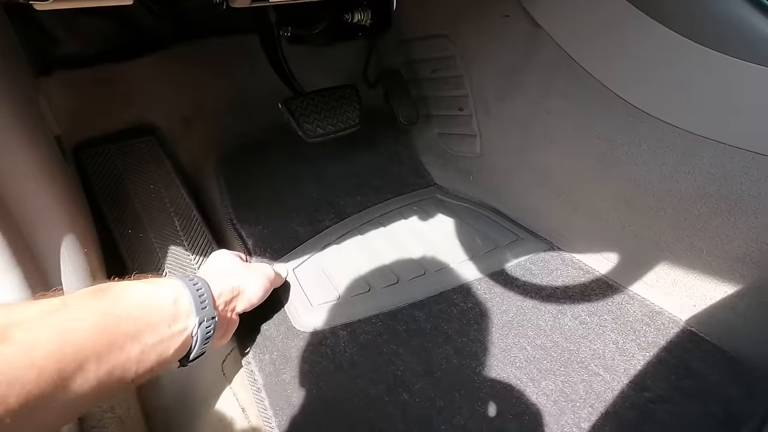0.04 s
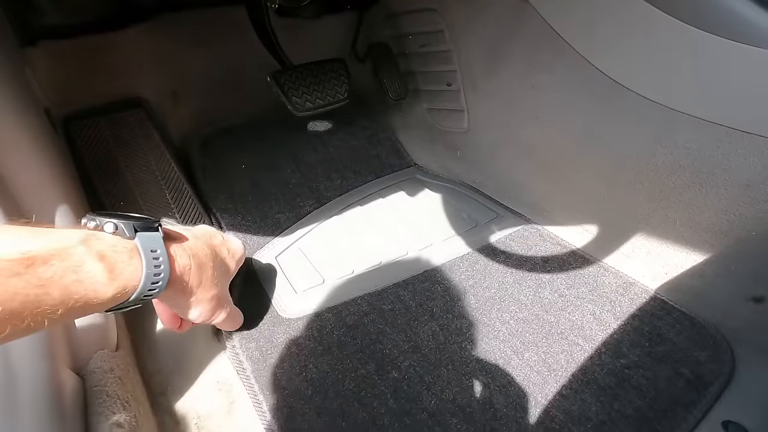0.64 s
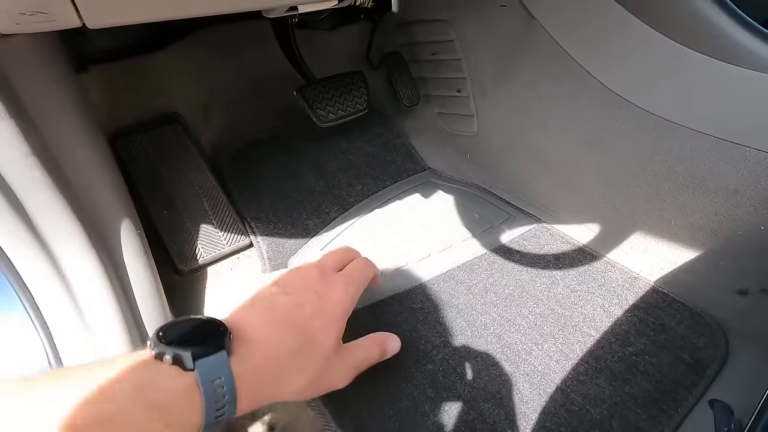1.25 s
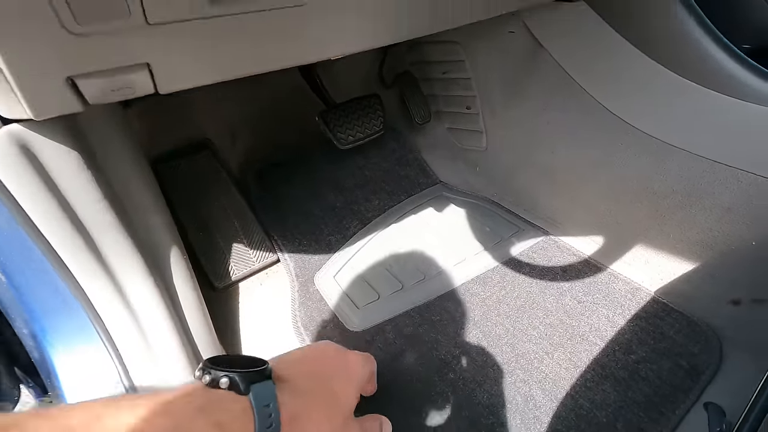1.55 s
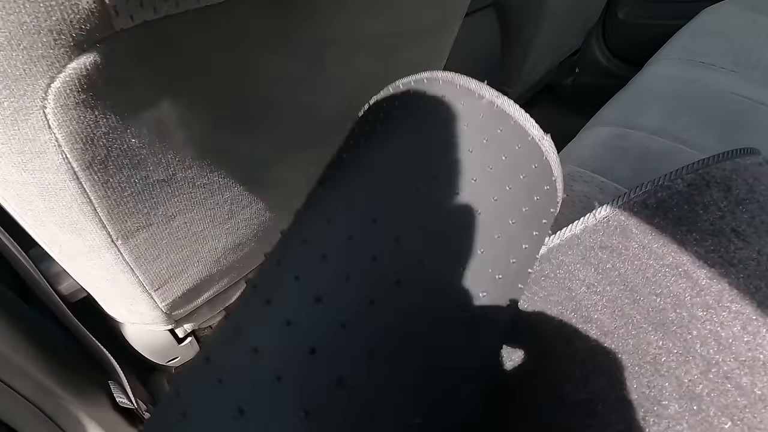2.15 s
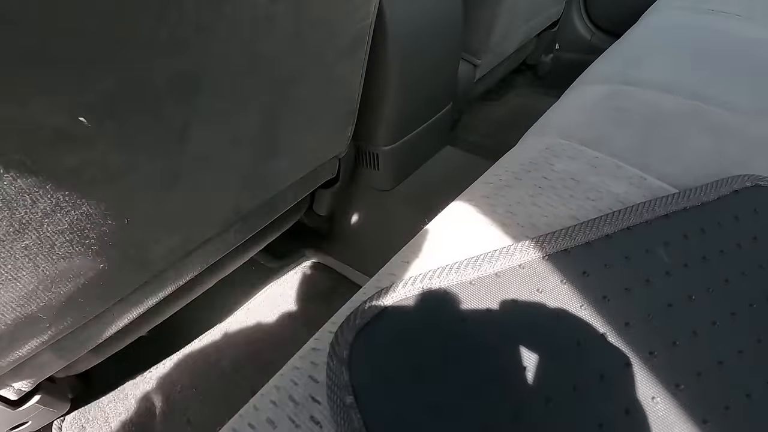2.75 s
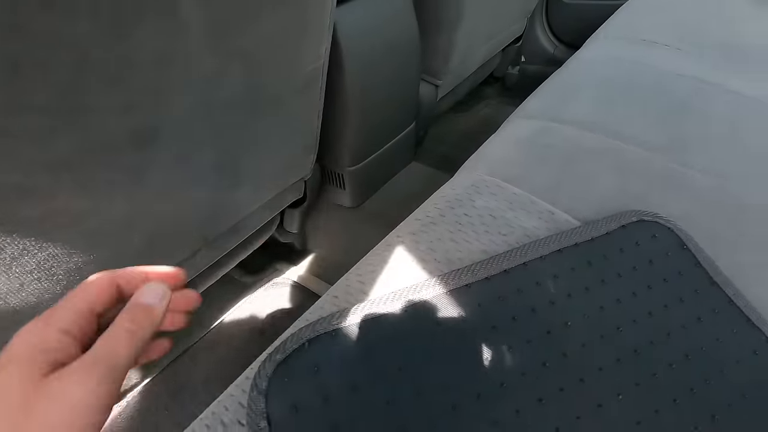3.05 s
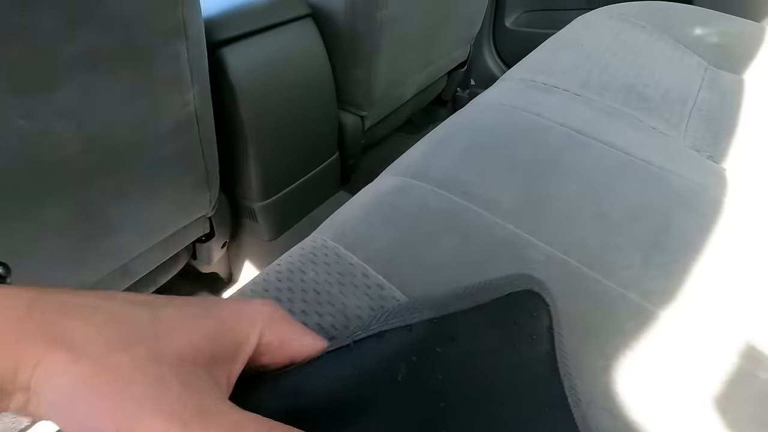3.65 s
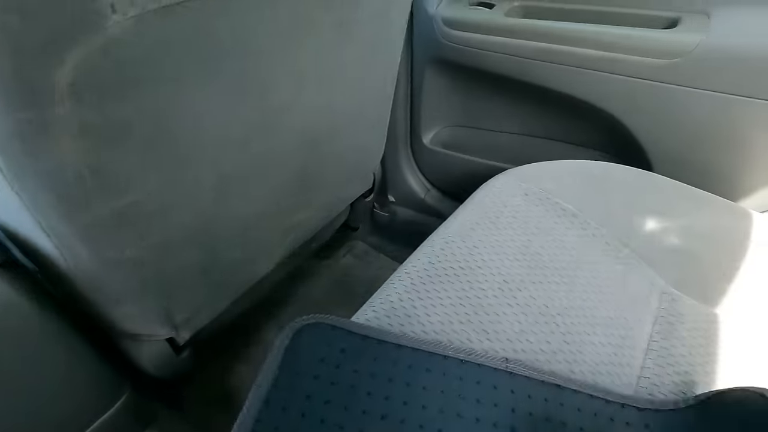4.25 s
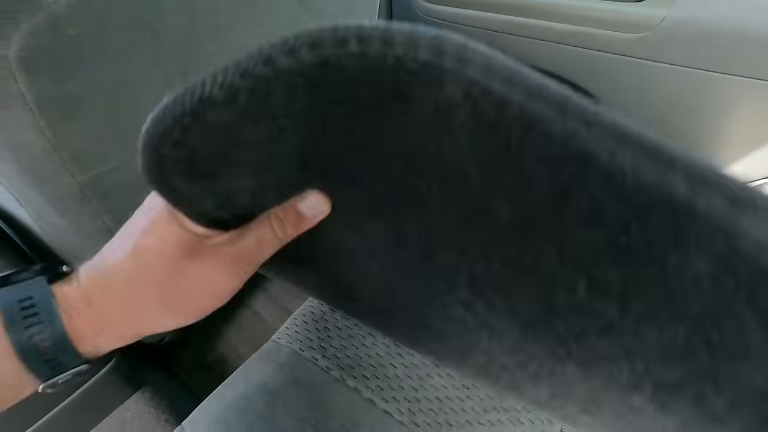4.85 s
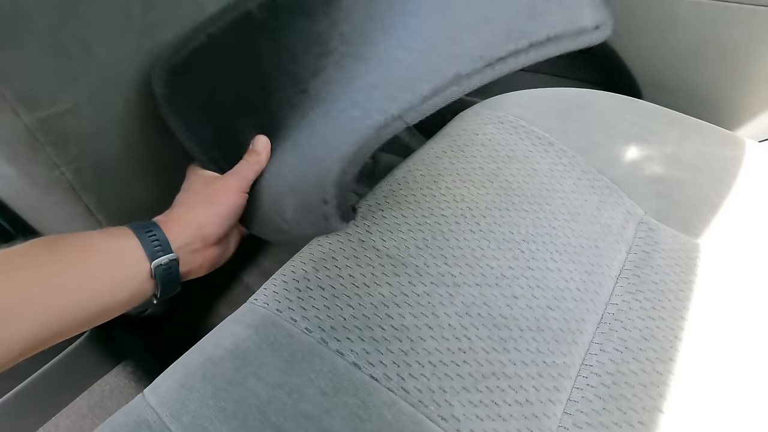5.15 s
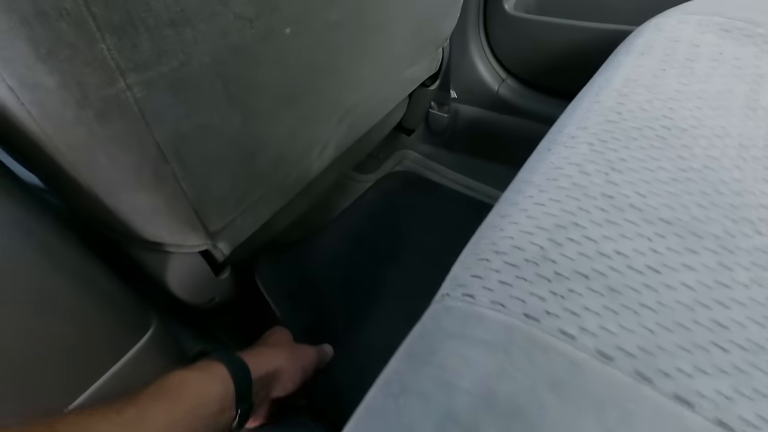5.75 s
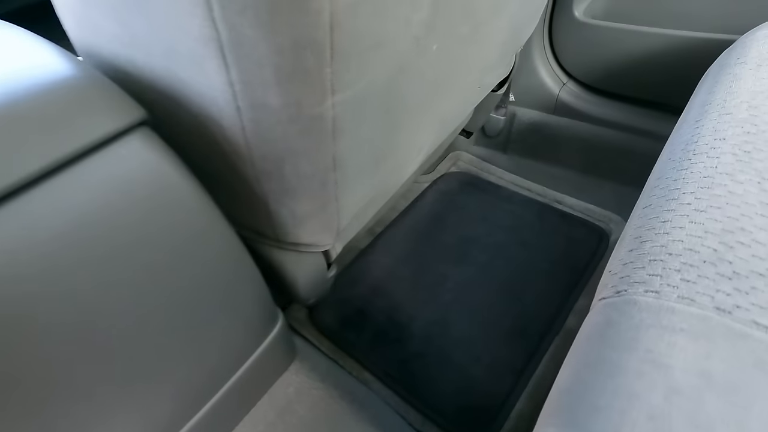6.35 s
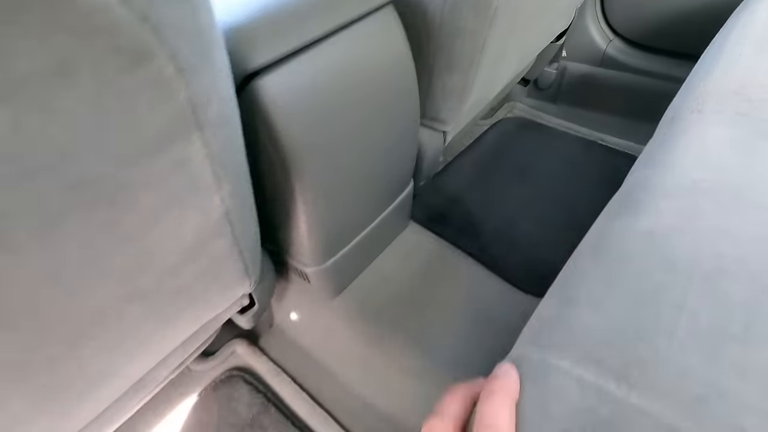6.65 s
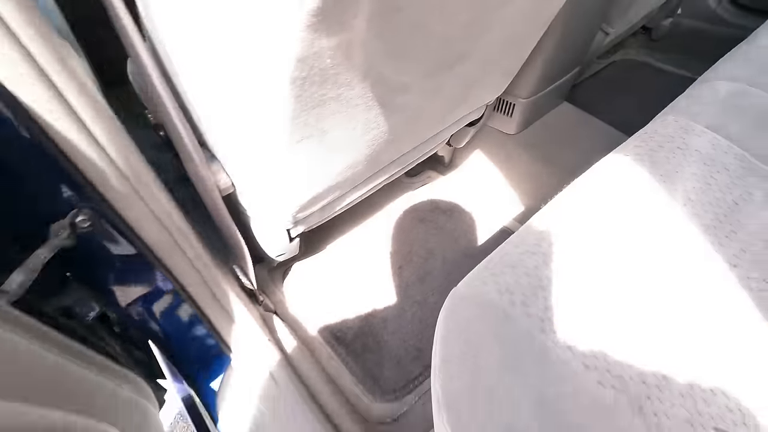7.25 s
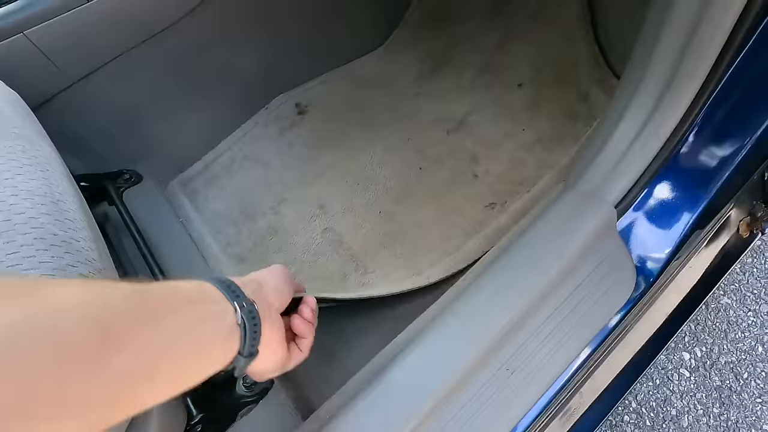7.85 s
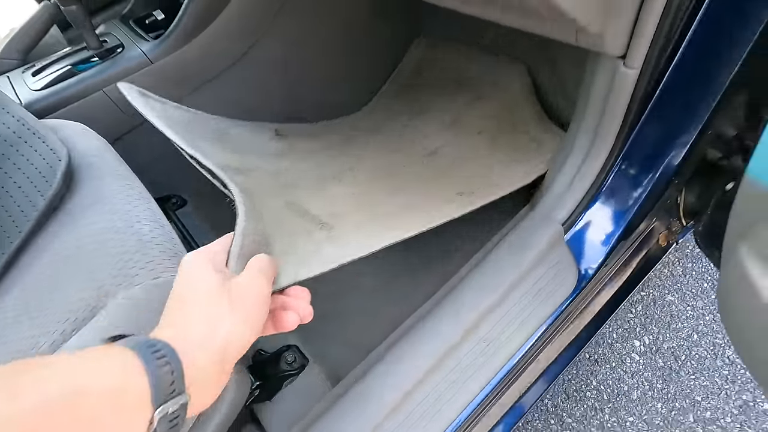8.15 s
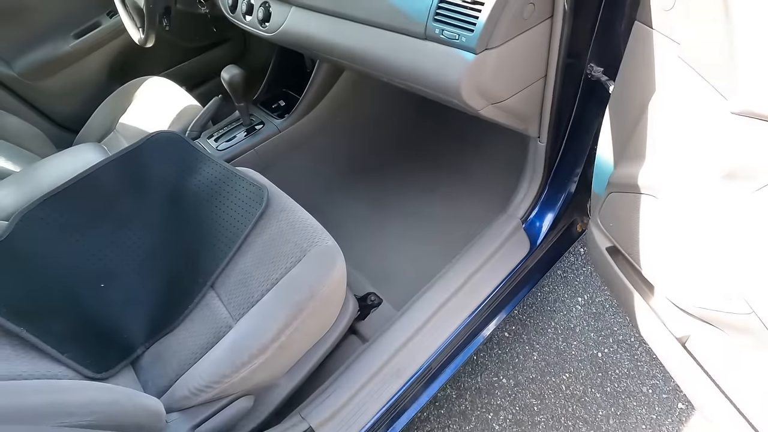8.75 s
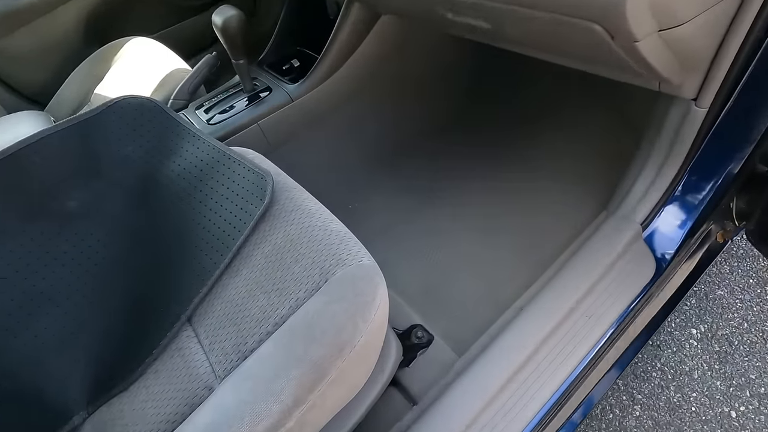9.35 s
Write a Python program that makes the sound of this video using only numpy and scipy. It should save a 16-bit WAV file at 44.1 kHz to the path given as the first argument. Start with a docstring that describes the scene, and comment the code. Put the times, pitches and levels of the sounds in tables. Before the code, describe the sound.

A car engine idles with a low boom and a soft airy wash while someone pulls out the floor mats, heard from an arm's length away in the cabin. Irregular carpet scuffs and rustles mix with muffled thumps, hollow knocks and small plastic clicks. Finally a rubber mat sticks and slips across the sill, rasping and squeaking briefly before it lands with a slap.

```python
"""Inside a padded car cabin, engine idling, microphone at arm's length from the floor mats being pulled out.
Carpet mats brush over seats and floor, fibres flicking free, and flop down with dull thumps; trim ticks.
Near the end a stiff rubber mat sticks and slips over the door sill, juddering and squeaking, and slaps
down. Behind it all are the engine's boom, a low rumble, a drifting hum and a soft airy wash."""
import sys
import numpy as np
from scipy import signal
from scipy.fft import rfft, irfft, next_fast_len
from scipy.io import wavfile
from scipy.ndimage import uniform_filter1d, map_coordinates

SR = 44100
rng = np.random.default_rng(int(sys.argv[2]) if len(sys.argv) > 2 else 0)


def bounce(signal):
    """Save signal as a 16-bit WAV file at the path given by the first command-line argument."""
    frames = np.transpose(np.atleast_2d(signal))
    limited = np.clip(frames, -1, 1)
    pcm = np.round(limited * 32767).astype(np.int16)
    wavfile.write(sys.argv[1], SR, pcm)


N = 419391

# A mat or hand slides over carpet: (start [s], length [s], backing rub [dB], pile hiss [dB])
STROKES = [(0.051, 0.15, -43, -52.5), (0.201, 0.13, -41.5, -56), (0.327, .13, -56, -65),
           (.56, .1, -64, -67), (0.728, 0.078, -56, -73), (0.97, 0.056, -53, -60), (1.023, 0.094, -49, -61),
           (1.167, 0.1, -56, -61), (1.54, 0.069, -64, -56.5), (1.724, 0.34, -43.5, -60),
           (2.01, 0.14, -41, -58), (2.117, 0.18, -51, -62), (2.353, 0.2, -38.5, -53),
           (2.597, 0.028, -59, -53.5), (2.753, 0.065, -58, -62.5), (2.93, .09, -69, -67),
           (3.28, 0.084, -55, -62), (3.716, 0.08, -56, -53.5), (3.84, 0.33, -50.5, -53),
           (4.153, 0.19, -46, -47.5), (4.364, 0.16, -48.5, -60), (4.607, 0.12, -63, -61),
           (4.72, 0.078, -49.5, -52.5), (4.917, 0.22, -69, -64.5), (5.2, 0.14, -61, -52),
           (5.313, 0.077, -58, -56), (5.81, .2, -58, -52), (6.117, 0.14, -50.5, -47),
           (6.26, 0.07, -56.5, -52.5), (6.537, 0.26, -63, -58), (6.78, 0.49, -46, -43.5),
           (7.027, 0.25, -54, -50), (7.834, 0.32, -43.5, -54), (8.027, 0.13, -58, -50.5),
           (8.385, 0.21, -35, -43), (8.739, 0.11, -37.5, -45.5), (9.11, 0.06, -38, -42)]
# Fingers seize the pile, which springs back: (time [s], backing rub [dB], pile hiss [dB])
GRABS = [(.515, -42.5, -51), (.68, -53, -53), (0.885, -48.5, -52), (0.929, -48, -49.5),
         (1.126, -49.5, -50.5), (1.44, -55, -49), (2.345, -41, -53), (3.37, -42.5, -50.5),
         (3.509, -44.5, -52.5), (4.859, -51.5, -54), (5.151, -40, -48.5), (6.421, -54, -58),
         (7.654, -42.5, -49.5)]
# Backing, pile and finest fibres, heard close: (frequency [Hz], level [dB])
BACKING = [(150, -29), (300, -1.5), (600, 3), (800, -1.5), (1100, 3), (1800, -10), (3000, -11.5),
           (6000, -31.5), (12000, -57)]
PILE = [(800, -32.5), (1500, -2.5), (2400, 1.5), (4500, -1), (7800, -5), (9500, -17), (12500, -28.5),
        (15500, -48)]
NAP = [(5000, -18), (8500, 4), (10000, -3.5), (12500, -2), (14000, -11.5), (15500, -35)]


def carpet(fastest_at=0.66, nap_db=-59, hard_db=-44, bump_db=-8, bump_max_db=-37):
    """Countless fibres flick free as a mat slides and the backing rubs lower; both follow its speed."""
    rub, hiss = np.zeros((2, N))
    moves = []
    for start, length, *levels in STROKES:
        angle = np.interp(np.linspace(0, 1, int(length * SR)), [0, fastest_at, 1], [0, np.pi / 2, 0])
        moves.append((start, np.sin(angle) ** 0.99, *levels))
    snatch = dying(np.arange(SR // 2) / SR, t60=0.36, attack=0.0045)
    moves += [(start, snatch, *levels) for start, *levels in GRABS]
    for start, speed, rub_db, hiss_db in moves:
        add(rub, start, amp(rub_db) * speed)
        add(hiss, start, amp(hiss_db) * speed)
    nap = amp(nap_db) * np.minimum(hiss / amp(hard_db), 1) ** 2  # hard strokes stir the finest fibres
    pull = amp(2.1 * np.tanh(wobble(45)) - 1.5)  # the mat catches and gives a little
    fibres = hiss * weave(coloured(grains(7000, scatter_db=0), PILE), patchy_db=2.5)
    fibres += nap * coloured(rng.standard_normal(N), NAP)
    seams = coloured(spread(grains(35, scatter_db=3), t60=0.015), KNOCK)  # it bumps over seams and edges
    bumps = np.minimum(rub * amp(bump_db), amp(bump_max_db)) * seams
    backing = rub * coloured(grains(2500, scatter_db=3), BACKING)
    return pull * (backing + bumps + fibres)


def weave(x, patchy_db):
    """The grain of the cloth shifts under the hand: patches of colour come and go."""
    spectra = signal.stft(x, nperseg=512)[2]
    patches = uniform_filter1d(rng.standard_normal(spectra.shape), size=9, axis=0)
    patches = uniform_filter1d(patches, size=9, axis=1)
    return unit(signal.istft(spectra * amp(patchy_db * unit(patches)), nperseg=512)[1][:N])


# Mats land and hands bump at arm's length, levels relative:
# (time [s], thump [dB], floor pitch [Hz], knock [dB], knock pitch [Hz], slap [dB])
THUMPS = [(.521, -21.5, 114, -27, 533, -45.5), (0.908, -10, 107, -20, 437, -36.5),
          (1.431, -7.5, 110, -13, 343, -25), (1.538, -29, 87, -32, 730, -62),
          (1.989, -9.5, 144, -20.5, 570, -37.5), (2.064, -26, 166, -32, 656, -47),
          (2.085, -20.5, 78, -27, 1170, -42), (2.115, -18.5, 101, -24.5, 565, -54),
          (2.347, -15.5, 95, -22.5, 354, -41), (2.475, -14, 92.6, -19.5, 735, -39),
          (2.491, -12.5, 95, -7, 513, -29), (2.515, -15.5, 63, -35, 650, -38),
          (2.586, -35, 110, -32, 715, -45), (2.641, -14.5, 250, -13.5, 700, -42),
          (2.648, -3.5, 122, -23, 310, -59), (2.691, -23, 160, -32, 584, -50),
          (2.725, -25.5, 159, -40, 400, -54), (3.384, -23, 93, -55, 600, -46),
          (3.556, -20.5, 127, -47, 300, -52), (4.101, -30, 196, -31.5, 425, -52),
          (4.144, -26.5, 173, -39, 596, -61), (4.275, -13, 98, -17.5, 252, -44),
          (4.289, -8, 66, -26.5, 300, -49), (4.518, -33, 150, -38, 1180, -49),
          (4.557, -21.5, 103, -35, 327, -65), (5.141, -19.5, 93, -29, 540, -44),
          (4.341, -40, 150, -37, 320, -48), (4.594, -32, 159, -42, 400, -56),
          (5.367, -36, 148, -38, 420, -60), (5.384, -35, 149, -31, 520, -46),
          (5.497, -34, 152, -25, 383, -37), (5.647, -34, 155, -36, 316, -65),
          (5.851, -34, 140, -43, 330, -58), (5.446, -9.5, 86, -20.5, 312, -36),
          (5.458, -14, 94.5, -23, 256, -57), (6.056, -14, 66.6, -31, 514, -41.5),
          (6.077, -19, 129, -31.5, 460, -41.5), (6.442, -27.5, 150, -30, 377, -62),
          (6.492, -40, 238, -33.5, 487, -44), (6.898, -23, 171, -30.5, 322, -37.5),
          (7.228, -28, 164, -31.5, 566, -47), (7.492, -41, 189, -45, 650, -51),
          (7.573, -37, 167, -32.5, 613, -37), (7.654, -15, 133, -25, 373, -37),
          (7.68, -18, 120, -26, 404, -38), (8.2, -15.5, 126, -20, 470, -27),
          (8.374, -32, 164, -16, 653, -24), (8.63, -31, 202, -20, 740, -24.5),
          (9.104, -15, 230.2, -13.5, 700, -27), (9.11, -16.5, 243, -14.5, 400, -32)]
# Modes of the floor under a mat: (multiple of the floor pitch, level [dB])
FLOOR_MODES = [(1, 0.5), (1.45, -10.5), (2.1, -11.5)]
# The hollow knock and the slap of the edge: (frequency [Hz], level [dB])
KNOCK = [(80, -6), (200, 7.5), (400, 7.5), (750, 0.5), (1100, -10), (1800, -33), (5000, -53)]
SLAP = [(300, -16), (1100, 9.5), (1850, 2.5), (3200, -2.5), (5000, -5.5), (8000, -12.5), (10000, -26.5),
        (15000, -45)]


def thumps(ring_cycles=7.9, footwell_hz=253.7):
    """A landing mat knocks and slaps; the damped floor and footwell ring, then the rest of it settles."""
    track, t = np.zeros(N), np.arange(SR // 3) / SR
    footwell = amp(-16) * np.sin(2 * np.pi * footwell_hz * t) * dying(t, t60=0.047, attack=0.0031)
    for start, db, pitch, knock_db, knock_hz, slap_db in THUMPS:
        floor = sum((-1) ** k * amp(level + rng.normal(0, 1)) * np.sin(2 * np.pi * pitch * ratio * t)
                    for k, (ratio, level) in enumerate(FLOOR_MODES, 1))
        floor *= dying(t, t60=ring_cycles / pitch, attack=0.0042)
        thud, edge = rng.standard_normal((2, len(t)))
        hollow = filtered(thud, lambda hz: 0.57 + band(hz, knock_hz, octaves=1))
        knock = np.sin(2 * np.pi * knock_hz * t) + 0.81 * coloured(hollow, KNOCK)
        slap = coloured(edge, SLAP) * dying(t, t60=0.09, attack=0.00021)
        settle = coloured(thud, RUMBLE) * dying(t, t60=0.4, attack=0.012)
        add(track, start, amp(db - 1.28) * (floor + footwell))
        add(track, start, amp(knock_db - 4.5) * knock * dying(t, t60=0.032, attack=0.00097))
        add(track, start, amp(slap_db - 2.5) * slap)
        add(track, start, amp(db - 21) * settle)
    return track


# The rubber mat drags or flaps against the door sill:
# (hardest moment [s], build-up [s], easing [s], level [dB], ring pitch [Hz], ring lift [dB])
PULLS = [(8.31, 0.11, .014, -32, 1205, 0), (8.5, .13, 0.099, -22.5, 2230, 1.5),
         (8.565, 0.061, 0.013, -31, 650, 3), (8.632, .06, .011, -27, 1083, -6),
         (8.766, .008, .016, -31.5, 1190, 16.5), (8.82, 0.037, .03, -38, 1198, -1),
         (9.106, .004, .013, -24.5, 940, 3.5), (9.16, .035, .022, -22, 1630, 6),
         (9.184, 0.008, 0.005, -24, 875, 4), (9.244, 0.003, 0.0076, -34.5, 1050, 11.5),
         (9.264, .003, 0.013, -29, 900, 1), (9.305, 0.025, 0.02, -42.5, 970, 7.5)]
# Resonances of the flexing sheet and the footwell around it: (centre [Hz], width [Hz], lift [dB])
SHEET = [(653, 67, 7), (780, 39, -3.5), (974, 100, 2.5), (1390, 83, 3.5), (1440, 80, -4), (1940, 110, 1.5),
         (2500, 130, 2.5), (2840, 130, 7.5)]
# The rasp of rubber: (frequency [Hz], level [dB])
RUBBER = [(120, -6), (220, 5), (400, -5), (700, -4.5), (1050, 0), (1600, -5.5), (2300, -9.5), (3300, -12),
          (4500, -17.5), (6000, -22.5), (7800, -29.5), (9000, -38), (12500, -49), (15500, -68.5)]


def rubber_drags(sag_db_per_s=50, release_db_per_s=999, slip_hz=481.4, db_per_octave=24, grit=0.46):
    """Rubber sticks and slips; each slip rings the sheet, at a pitch set by its bend, and frees grit."""
    (level, track), t = np.zeros((2, N)), np.arange(SR // 3) / SR
    swells = []
    for hardest, build, ease, db, ring_hz, lift_db in PULLS:  # a pull builds, eases, then comes free
        start, late = max(hardest - build, 0), t - build
        fall_db = sag_db_per_s * np.maximum(late, 0) + release_db_per_s * np.maximum(late - ease, 0)
        swell = np.minimum(t / build, 1) ** 1.2 * amp(db - fall_db)
        swells.append((start, swell, ring_hz, lift_db))
        add(level, start, swell)
    level_db = 20 * np.log10(level + 1e-4)
    rate = slip_hz * 2 ** ((level_db + 20) / db_per_octave)  # a harder pull slips faster
    slips = np.cumsum(rate * np.exp(0.25 * wobble(150))) / SR
    jerks = np.diff(np.floor(slips), prepend=0) * np.sqrt(SR / (rate + 1)) * amp(rng.standard_normal(N))
    contact = 2 * np.pi * np.cumsum(9 + 4 * wobble(20)) / SR  # the ring changes as the contact travels
    blend = [wave(angle) / np.sqrt(2) for angle in (contact, np.e * contact) for wave in (np.cos, np.sin)]
    ringing = sum(share * spread(jerks, t60=0.012) for share in blend)
    puffs = 2 * np.exp(-2 * (slips % 1)) * rng.standard_normal(N)
    judder = amp(wobble(130)) * (ringing + grit * puffs)

    def sheet(hz):
        return amp(sum(db / (1 + (2 * (hz - centre) / width) ** 2) for centre, width, db in SHEET))

    rasp = coloured(filtered(judder, sheet), RUBBER)
    for start, swell, ring_hz, lift_db in swells:
        piece = rasp[round(start * SR):][:len(t)]
        piece = piece * swell[:len(piece)]
        add(track, start, filtered(piece, lambda hz: amp(lift_db * band(hz, ring_hz, octaves=0.31))))
    return track


# The rubber catches and sings: (start [s], length [s], level [dB], pitch [Hz])
SQUEAKS = [(2.408, 0.05, -35.5, 1110), (4.059, 0.021, -37.5, 3200), (8.532, 0.018, -19, 582),
           (8.543, 0.04, -20.5, 661), (8.749, 0.036, -33, 1294), (9.143, 0.024, -25, 1641),
           (9.159, 0.027, -20.5, 953), (9.178, 0.012, -22, 1001), (9.26, 0.017, -23, 984)]


def squeaks(sag=0.069, waver_hz=70, rough_db=7, overtone_db=-15):
    """For a moment the slips lock into a rough, sinking tone."""
    track = np.zeros(N)
    waver, roughness = waver_hz * wobble(900), amp(rough_db * wobble(300))
    for start, length, db, pitch in SQUEAKS:
        progress = np.linspace(0, 1, int(length * SR))
        now = round(start * SR) + np.arange(len(progress))
        phase = 2 * np.pi * np.cumsum(pitch * (1 - sag * progress) + waver[now]) / SR
        tone = np.sin(phase) + amp(overtone_db) * np.sin(2 * phase)
        add(track, start, amp(db) * np.sin(np.pi * progress) * roughness[now] * tone)
    return track


# Hard little contacts with the trim nearby: (time [s], relative level [dB], pitch [Hz])
TICKS = [(.527, -35, 3980), (.691, -35, 5130), (1.432, -13.5, 1970), (1.451, -31, 4000),
         (1.713, -39.5, 5060), (2.475, -16.5, 5040), (2.491, -8.5, 3430), (2.492, -16, 1260),
         (2.495, -24.5, 8500), (3.268, -38, 4470), (4.060, -24, 3130), (4.213, -29, 6000),
         (4.811, -40, 5000), (4.885, -23, 3100), (5.286, -45, 2300), (5.389, -27.5, 5070),
         (5.405, -34.5, 6000), (5.496, -24.5, 3700), (7.297, -33.5, 3900), (6.467, -43, 4000),
         (7.398, -18.5, 2520), (7.399, -25, 5600), (7.489, -14.5, 1570), (7.491, -23, 4860),
         (7.572, -16.5, 1460), (8.403, -14.5, 1240), (8.806, -17, 1200), (9.086, -19, 1395),
         (9.123, -14, 3640), (9.182, -20, 2699), (9.241, -24, 3400), (9.261, -9.5, 3707)]
# The colour of plastic trim: (frequency [Hz], level [dB])
TRIM = [(300, -17), (900, 7), (2000, 3.5), (4000, -4.5), (7000, -5), (10000, -21), (15000, -40)]


def trim_ticks():
    """Each contact rings the plastic briefly in a broad band around one pitch."""
    track, t = np.zeros(N), np.arange(SR // 6) / SR
    for start, db, pitch in TICKS:
        ring = filtered(rng.standard_normal(len(t)), lambda hz: 0.071 + band(hz, pitch, octaves=0.48))
        add(track, start, amp(db - 12) * coloured(ring, TRIM) * dying(t, t60=0.039, attack=0.00032))
    return track


# The edge of a mat scratches along: (start [s], length [s], level [dB], centre [Hz])
SCRAPES = [(0.138, 0.033, -41.5, 970), (1.794, .15, -53.5, 1110), (3.981, 0.081, -49.5, 1230),
           (4.431, .075, -55.5, 1880), (5.152, 0.028, -44, 1670), (5.197, 0.039, -53, 1190),
           (6.146, 0.038, -52.5, 1370), (6.401, 0.071, -50, 407), (6.636, .15, -50, 385),
           (5.256, 0.13, -56, 2300), (7.002, 0.15, -51, 2370)]


def scrapes():
    """A stiff edge plucks the tufts one by one: a short scratch, higher on carpet, lower on a seat."""
    track = np.zeros(N)
    snaps = spread(grains(380, scatter_db=1.5), t60=0.0067)
    for start, length, db, centre in SCRAPES:
        piece = snaps[round(start * SR):][:int(length * SR)]
        scratch = filtered(piece, lambda hz: band(hz, centre, octaves=0.76) ** 1.64)
        swell = np.sqrt(abs(np.sin(np.linspace(0, np.pi, len(scratch)))))
        add(track, start, amp(db) * unit(scratch * swell))
    return track


def friction():
    """The mats rub, scratch, tick and rasp, with fresh grain on every call."""
    return carpet() + scrapes() + trim_ticks() + rubber_drags()


# The engine's boom varies as the microphone moves about: (time [s], relative level [dB])
IDLE_LEVEL = [(0.0, -29), (0.5, -26.5), (1.77, -27), (1.93, -22.5), (2.81, -30.5), (4.16, -22),
              (7.02, -22.5), (7.28, -26), (9.48, -30), (9.51, -29)]
# The idling engine: (time [s], firing rate [Hz])
FIRING_RATE = [(0, 21.95), (7.7, 22.3), (8.3, 22.7), (9.51, 21.7)]
# Its harmonics, heard from inside: (multiple of the firing rate, level [dB])
BOOM = [(1, 2), (2, -8.5), (3, -21), (4, -23), (5, -26.5), (6, -28), (7, -42)]


def engine_idle():
    """The firing tone and its multiples boom in the cabin."""
    phase = 2 * np.pi * np.cumsum(curves(FIRING_RATE)[0]) / SR
    boom = sum(amp(db + 0.58 * wobble(6)) * np.sin(k * phase + 2 * np.pi * rng.random()) for k, db in BOOM)
    return amp(curves(IDLE_LEVEL)[0] + 0.5) * unit(boom)


# The colour of the cabin's rumble, and of a settling mat: (frequency [Hz], level [dB])
RUMBLE = [(12, -8.5), (28, 1.5), (50, 2.5), (75, 0), (110, -2), (140, -3), (180, -6), (250, -12.5),
          (330, -20), (600, -38), (1300, -81)]
# The rumble at the microphone: (time [s], relative level [dB])
RUMBLE_LEVEL = [(0.0, -33.5), (1.83, -35), (1.96, -32.5), (2.62, -29), (2.89, -38), (4.34, -39.5),
                (6.2, -41), (7.15, -34.5), (7.71, -33.5), (8.26, -33.5), (8.66, -31), (9.51, -39)]


def rumble():
    """A low, restless rumble fills the cabin."""
    noise = coloured(rng.standard_normal(N), RUMBLE)
    return noise * amp(curves(RUMBLE_LEVEL)[0] + 1.5 + 2.1 * wobble(14))


# A low hum drifts in twice: (start [s], length [s], pitch [Hz], level [dB])
HUM = [(-.4, 1.63, 105.7, -33), (7.153, 0.84, 116.4, -33)]


def hum(sag_hz_per_s=4.5):
    """A low tone swells, wavers and sinks slowly."""
    track, t = np.zeros(N), np.arange(N) / SR
    for start, length, pitch, db in HUM:
        swell = np.sqrt(abs(np.sin(np.pi * np.clip((t - start) / length, 0, 1))))
        phase = 2 * np.pi * np.cumsum(pitch - sag_hz_per_s * (t - start)) / SR
        track += amp(db) * swell * np.sin(phase)
    return track * amp(0.71 * wobble(5.2))


# Around the microphone, levels relative: (time [s], airy wash [dB], sleeves and upholstery [dB])
SURROUND = [(0.0, -46, -57.5), (0.37, -47.5, -71), (1.65, -48, -75), (2.57, -46.5, -62), (2.75, -56, -68),
            (3.07, -58.5, -75), (4.18, -44.5, -53.5), (4.37, -53, -58), (4.62, -55, -63),
            (4.95, -54.5, -60.5), (5.33, -53, -51), (5.54, -56.5, -63.5), (6.04, -56, -59),
            (6.38, -57.5, -62.5), (6.52, -52.5, -56.5), (7.1, -44, -56.5), (7.28, -48, -58),
            (7.95, -44.5, -57.5), (8.48, -37, -51), (8.69, -45, -52.5), (9.05, -42.5, -57.5),
            (9.51, -47.5, -58)]
# The colour of the airy wash: (frequency [Hz], level [dB])
WASH = [(180, -25), (300, -6), (480, -7.5), (700, -11), (1150, -11), (2000, -20.5), (3200, -24.5),
        (7500, -37), (10000, -47), (15500, -92)]


def wash_and_rustle():
    """A soft airy wash swells with the louder mat strokes and the rubber scrape; cloth never rests."""
    wash_db, rustle_db = curves(SURROUND)
    wash = coloured(rng.standard_normal(N), WASH) * amp(wash_db - 1.37)
    rustle = coloured(grains(5000, scatter_db=0), PILE) * amp(rustle_db - 2 + 2.5 * wobble(12))
    return wash + rustle


# The short ring of the cabin: (frequency [Hz], time to fall 60 dB [s])
CABIN_T60 = [(100, 0.17), (500, 0.11), (3000, 0.1), (10000, 0.042)]


def cabin(x):
    """The upholstered cabin answers briefly, with two unlike tails."""
    hz, t, spectra = signal.stft(rng.standard_normal((2, SR // 4)), SR, nperseg=256)
    decay = amp(-60 * t / along(CABIN_T60, hz)[:, None])
    tails = signal.istft(spectra * decay, SR, nperseg=256)[1]
    return signal.fftconvolve(x[None], tails / np.linalg.norm(tails[0]), axes=1)[:, :N]


def amp(db):
    """Decibels to gain."""
    return 10 ** (np.asarray(db) / 20)


def unit(x):
    """x at rms 1."""
    return x / np.sqrt(np.mean(x ** 2) + 1e-20)


def along(points, hz):
    """(Hz, value) points read on a log axis."""
    freqs, values = np.transpose(points)
    return np.interp(np.log(hz + 1), np.log(freqs + 1), values)


def curves(rows):
    """One value per sample for each column after the time."""
    times, *columns = np.transpose(rows)
    return [np.interp(np.arange(N) / SR, times, column) for column in columns]


def wobble(rate):
    """A smooth random curve, rate knots a second."""
    knots = rng.standard_normal(int(N * rate / SR) + 4)
    fine = np.arange(10 * len(knots)) / 10
    return np.interp(np.arange(N) * rate / SR, fine, map_coordinates(knots, [fine]))


def band(hz, centre, octaves):
    """A bell of height 1 on the log frequency axis; octaves is its half width."""
    return 1 / (1 + (np.log2((hz + 1) / centre) / octaves) ** 2)


def filtered(x, response):
    """x times a response of frequency."""
    n = x.shape[-1]
    padded = next_fast_len(n + 8192, True)
    return irfft(rfft(x, padded) * response(np.fft.rfftfreq(padded, 1 / SR)), padded)[..., :n]


def coloured(x, spectrum):
    """x shaped by (Hz, dB) points, at rms 1."""
    return unit(filtered(x, lambda hz: amp(along(spectrum, hz))))


def dying(t, t60, attack):
    """A quick rise and an exponential fall, with its top at 1; times in seconds."""
    shape = (1 - np.exp(-t / attack)) * np.exp(-np.log(1000) * t / t60)
    return shape / shape.max()


def grains(rate, scatter_db):
    """Random tiny snaps of uneven size, about rate a second, at rms 1."""
    snaps = (rng.random(N) < rate / SR) * rng.standard_normal(N)
    return unit(snaps * amp(scatter_db * rng.standard_normal(N)))


def spread(x, t60):
    """Smear every impulse into a short random ring."""
    t = np.arange(SR // 25) / SR
    ring = rng.standard_normal(len(t)) * dying(t, t60, attack=0.00022)
    return signal.oaconvolve(x, ring / np.linalg.norm(ring))[:N]


def add(track, start, sound):
    """Mix a sound into the track from start seconds on."""
    part = track[round(start * SR):][:len(sound)]
    part += sound[:len(part)]


# The colour of the stereo side signal: (frequency [Hz], level [dB])
SIDE_COLOUR = [(25, -19), (150, -41), (250, -27), (500, -18.5), (1000, -14), (2500, -11), (5000, -13.5),
               (10000, -8.5)]
# The stereo image narrows and widens: (time [s], side gain [dB])
SIDE_GAIN = [(0, -44), (.65, -44), (1.0, -23), (1.75, -3), (1.86, -50), (2.4, -33), (2.8, -12.5), (3.7, -5),
             (5, 5), (9.51, 3.5)]


def scene(cabin_db=-12.5, lean_db=-35):
    """All lies ahead; a second layer of rubbing, wash and rumble gives width, nearly mono at first."""
    handling = friction() + thumps() + squeaks()
    cabin_mid, cabin_side = amp(cabin_db) * cabin(handling)
    mid = handling + cabin_mid + wash_and_rustle() + engine_idle() + rumble() + hum()
    second_layer = friction() + wash_and_rustle() + rumble() + cabin_side
    second_layer = filtered(second_layer, lambda hz: amp(along(SIDE_COLOUR, hz)))
    side = amp(curves(SIDE_GAIN)[0]) * (second_layer + amp(lean_db) * mid)
    return np.array([mid + side, mid - side])


def record(dry, top_hz=15750):
    """Nothing above the band limit is kept."""
    return filtered(dry, lambda hz: hz < top_hz)


dry = scene()
out = record(dry)
bounce(out)
```